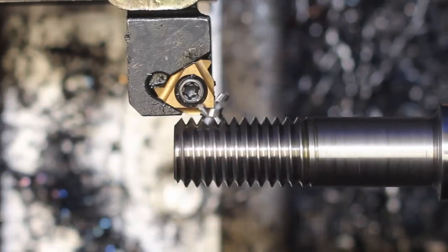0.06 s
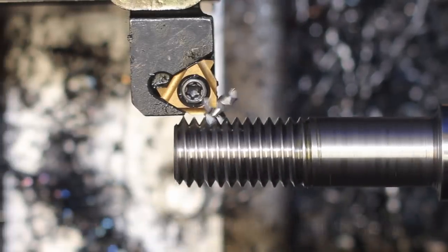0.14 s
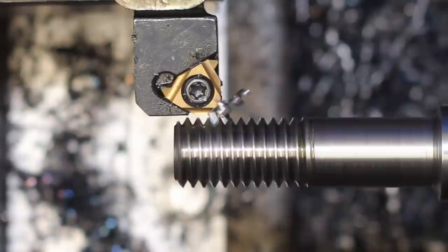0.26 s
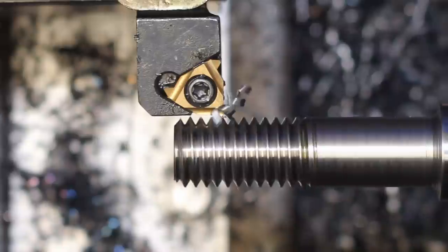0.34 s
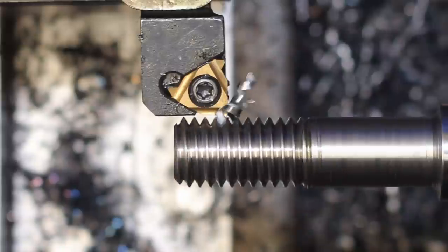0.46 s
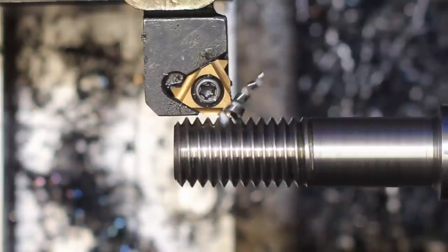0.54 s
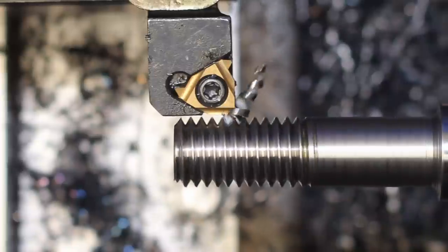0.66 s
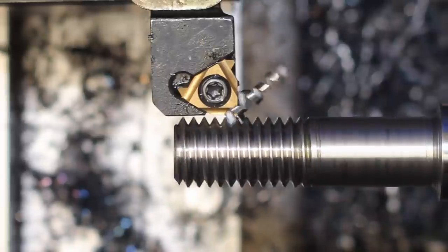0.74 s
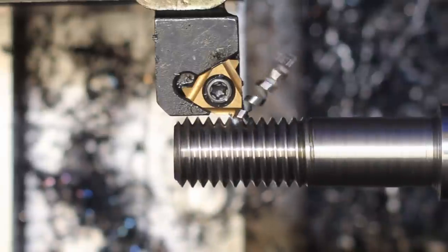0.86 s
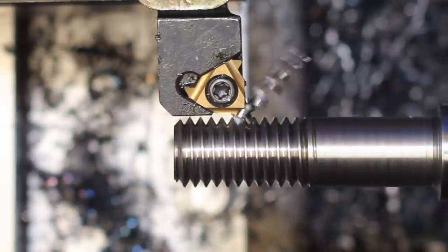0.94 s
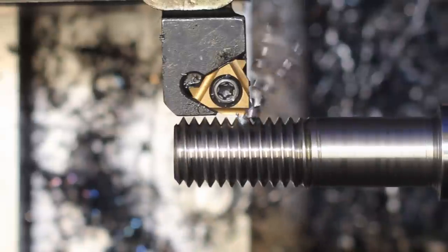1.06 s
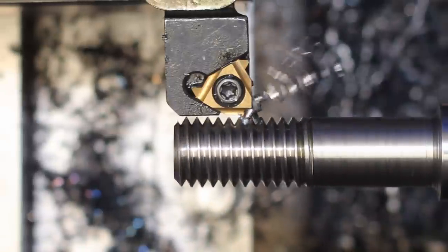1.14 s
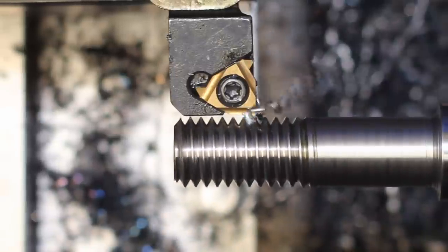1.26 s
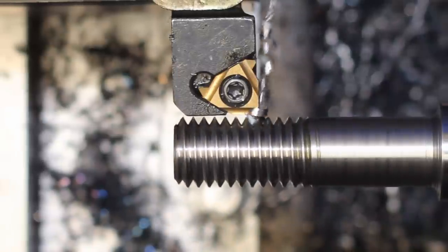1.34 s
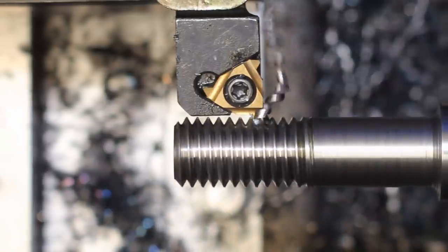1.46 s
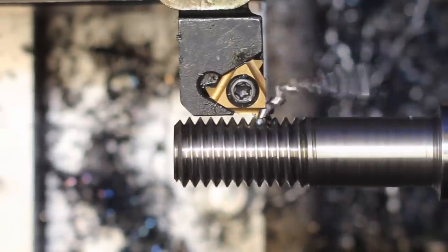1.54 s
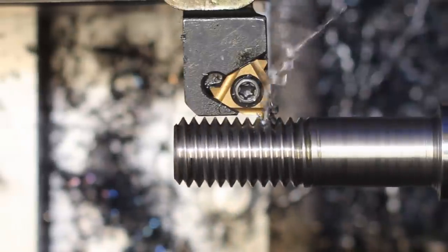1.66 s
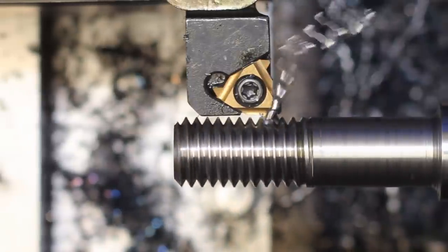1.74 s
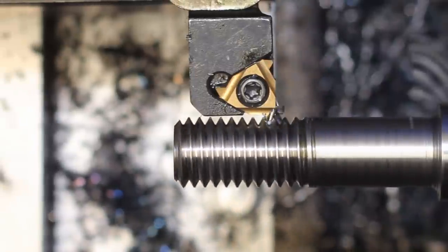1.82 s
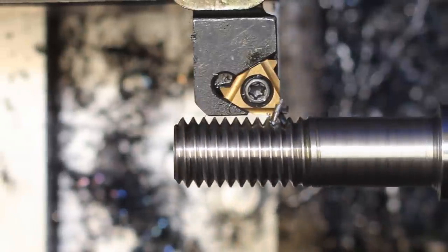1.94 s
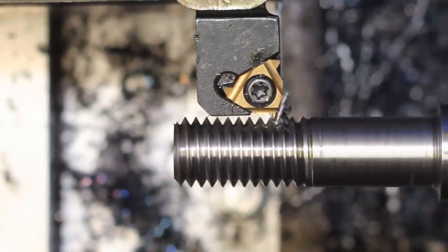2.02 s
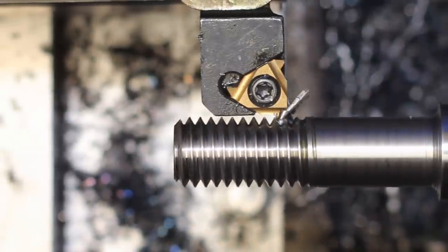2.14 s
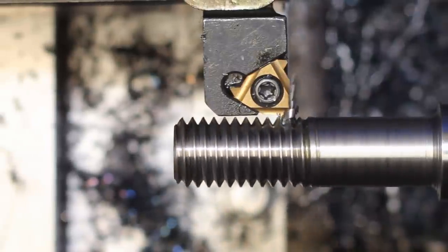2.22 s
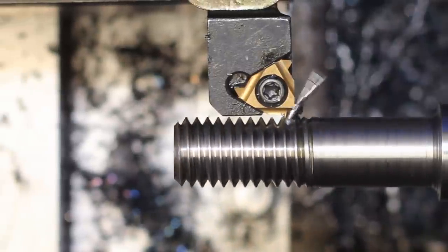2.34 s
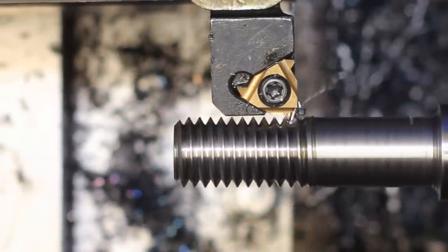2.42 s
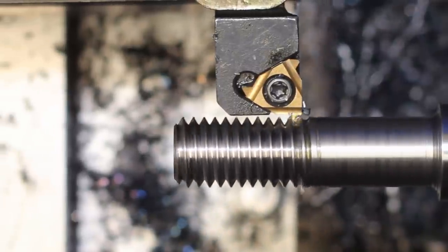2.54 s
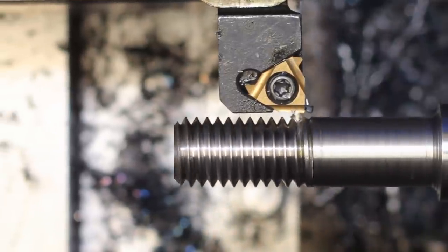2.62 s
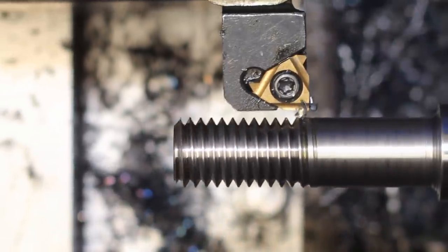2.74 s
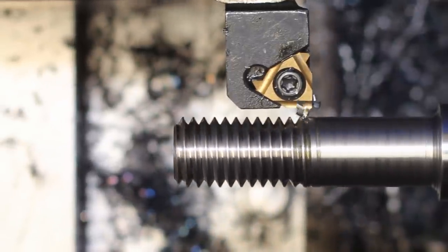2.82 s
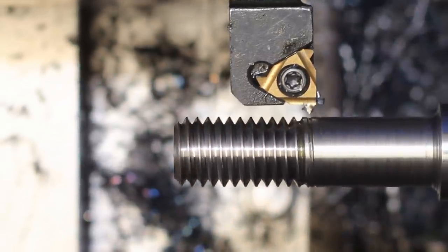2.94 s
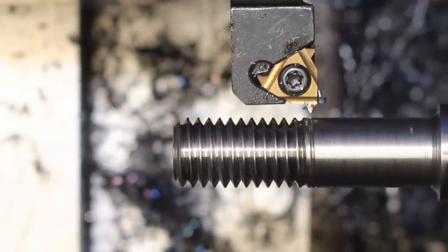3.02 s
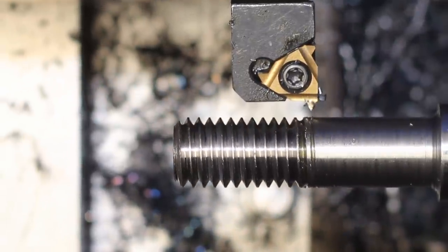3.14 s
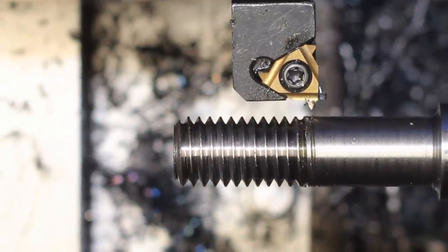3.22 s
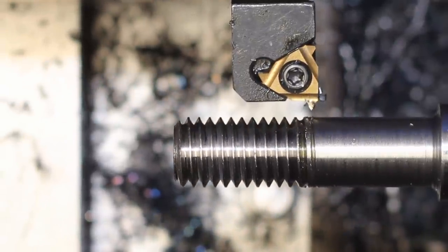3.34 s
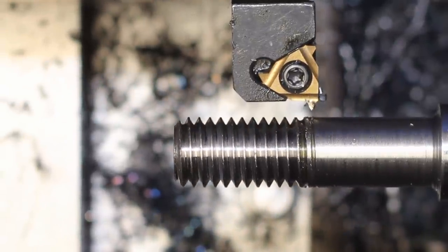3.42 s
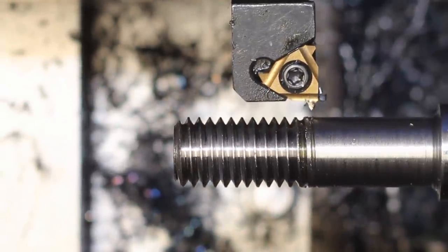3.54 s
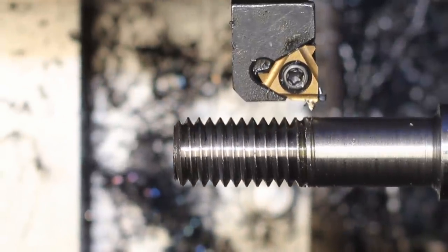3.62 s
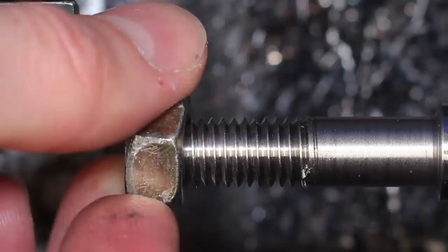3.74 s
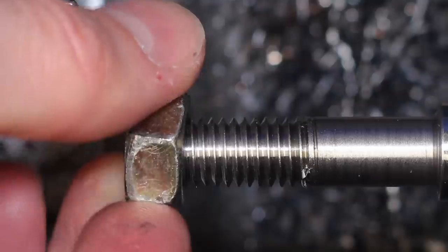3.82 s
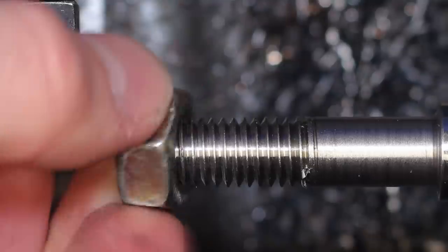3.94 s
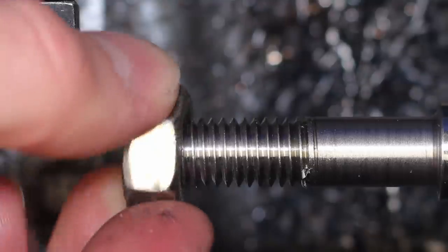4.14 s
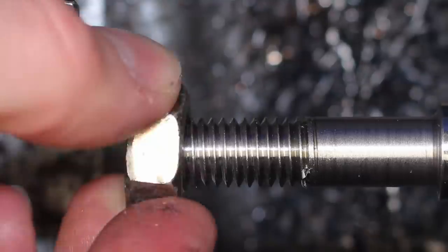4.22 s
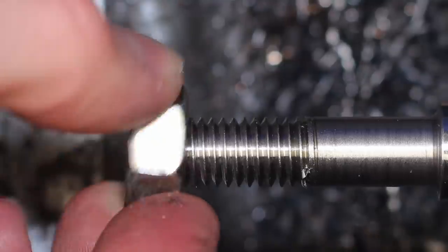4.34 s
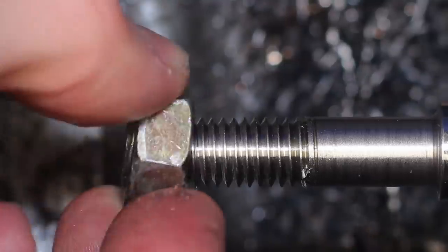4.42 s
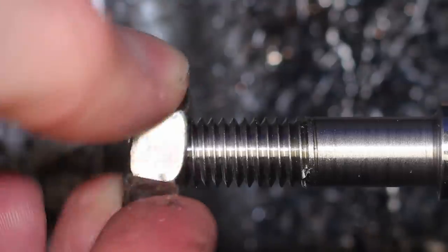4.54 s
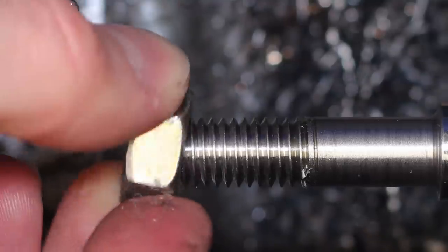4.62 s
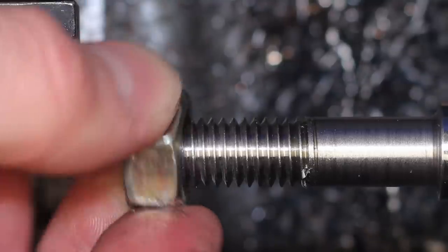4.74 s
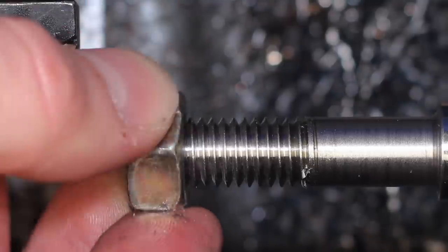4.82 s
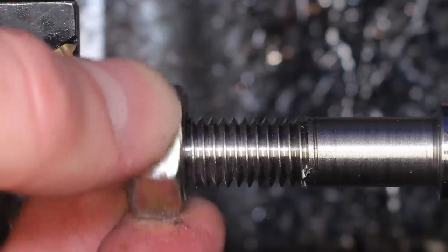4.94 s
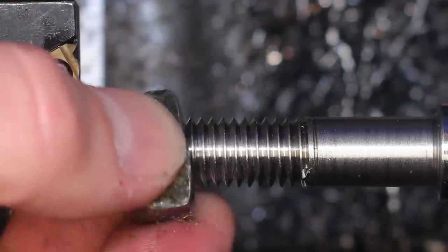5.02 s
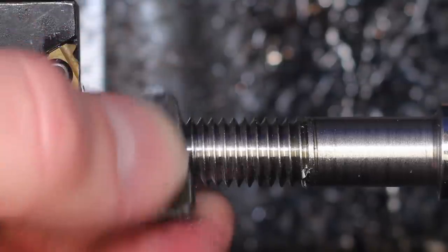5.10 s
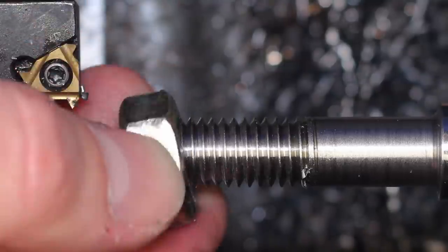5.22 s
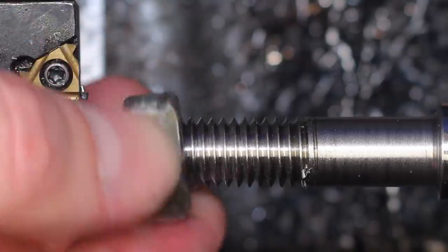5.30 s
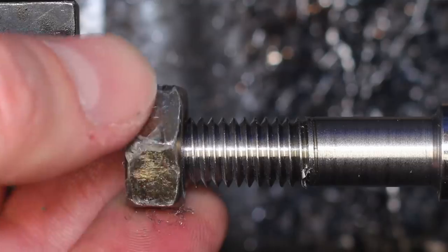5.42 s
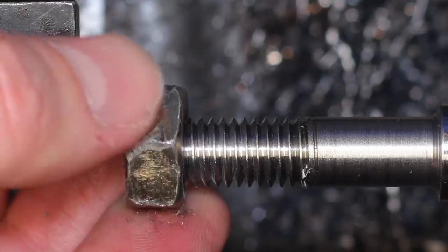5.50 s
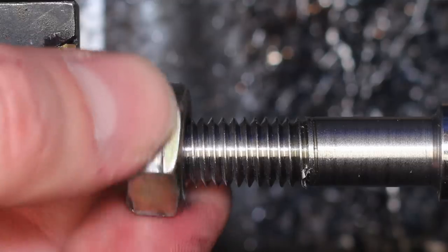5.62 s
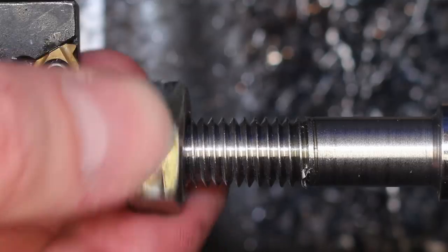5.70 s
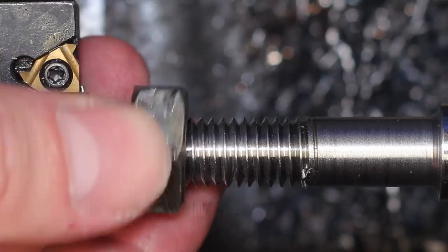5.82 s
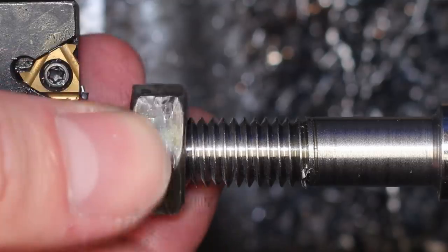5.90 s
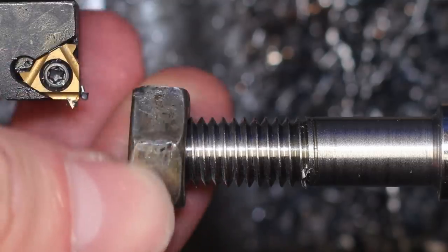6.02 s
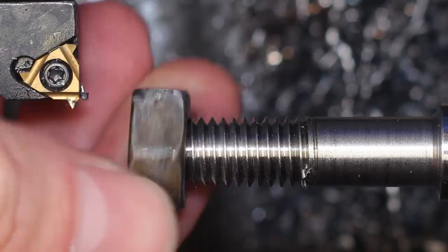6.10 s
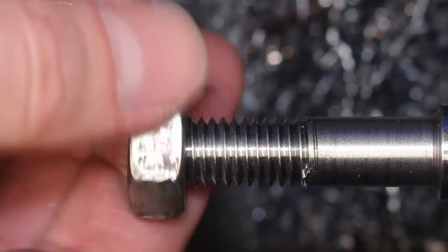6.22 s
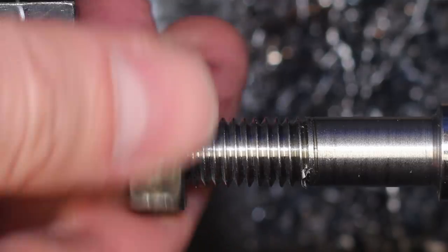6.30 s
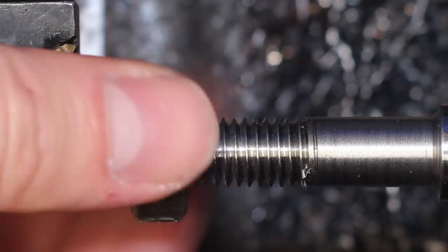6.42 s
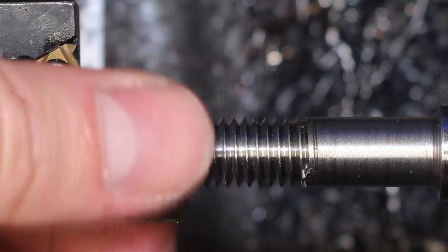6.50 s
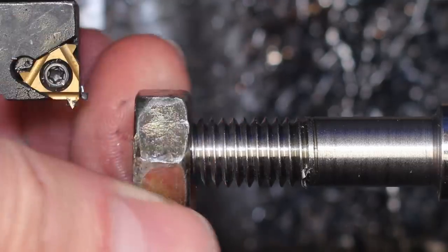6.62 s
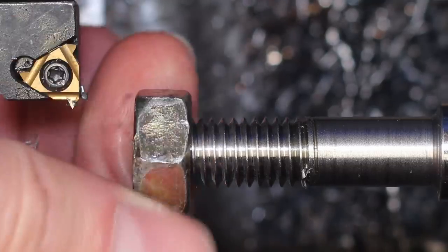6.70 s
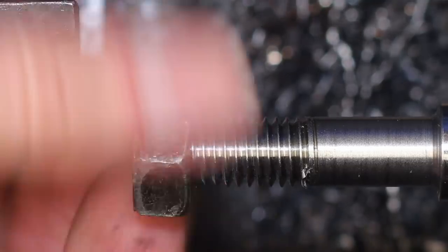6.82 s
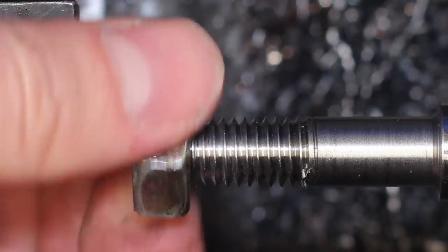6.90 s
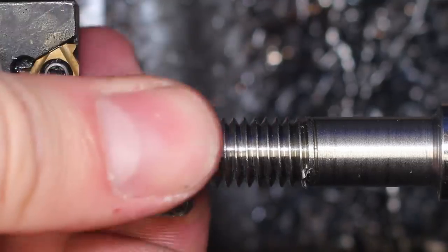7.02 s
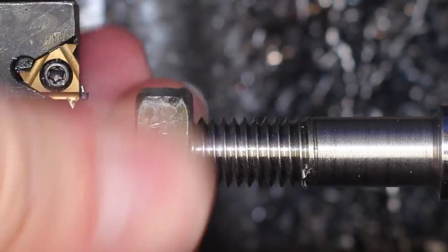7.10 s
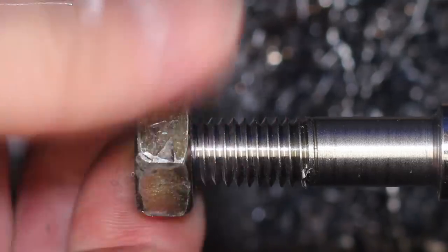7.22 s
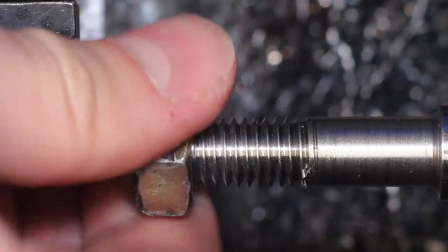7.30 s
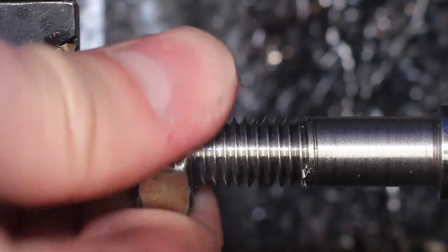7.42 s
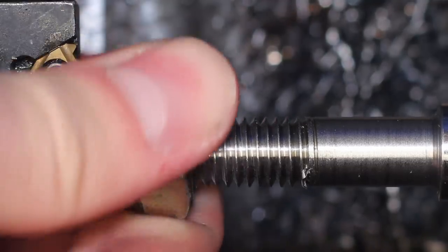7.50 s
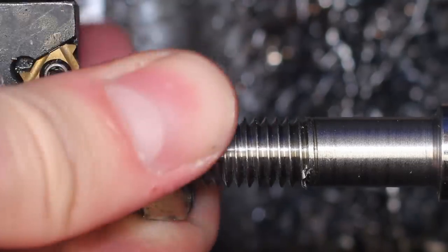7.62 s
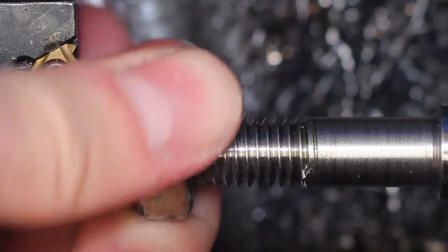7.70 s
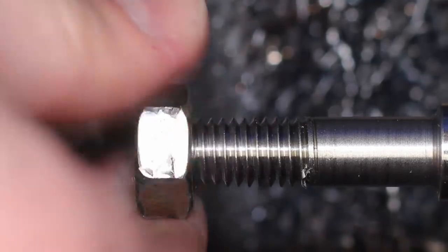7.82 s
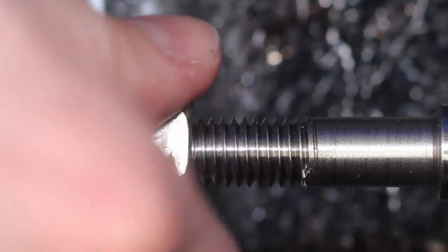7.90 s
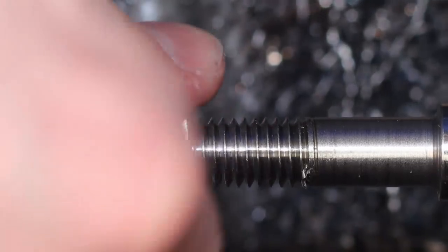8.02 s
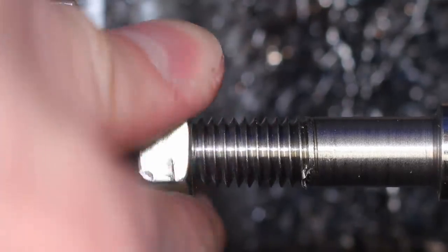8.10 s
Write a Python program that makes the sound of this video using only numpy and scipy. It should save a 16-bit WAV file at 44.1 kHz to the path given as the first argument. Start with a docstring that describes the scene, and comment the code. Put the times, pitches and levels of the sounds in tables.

```python
"""A small lathe in a quiet workshop takes a light threading pass on a steel bolt: gears rattle under load,
the motor whines, the chip hisses, squeals and ticks. The tool leaves the cut, the drive fades as it slows,
a control snaps and the slide is knocked back. Then a steel nut is tried on the thread, with faint taps and rubs.
Noise and pulses ring resonances, the whine and hum are sines, and hard blows strike crowds of dying modes.
It is heard in mono, as by one microphone, with no room or distance added: levels alone set near and far."""
import sys
import numpy as np
from scipy import signal
from scipy.fft import rfft, irfft, next_fast_len
from scipy.io import wavfile
from scipy.ndimage import uniform_filter1d

SR = 44100
rng = np.random.default_rng(int(sys.argv[2]) if len(sys.argv) > 2 else 0)


def int16_out(signal):
    """Quantize to a 16-bit WAV file."""
    q = np.round(np.clip(np.atleast_2d(signal).T, -1, 1) * 32767)
    wavfile.write(sys.argv[1], SR, q.astype(np.int16))


N = 359407
TIME = np.arange(N) / SR
RIPPLE_HZ = 100  # rectified mains
# the tool leaves the cut, and the load on the gears dies away
CUT_END_S, UNLOAD_S = 2.615, 0.047


def amp(db):
    """Decibels to gain."""
    return 10 ** (np.asarray(db) / 20)


def unit(x):
    """Scale to rms 1."""
    return x / np.sqrt(np.mean(x ** 2) + 1e-20)


def curves(rows):
    """Each column of a table, joined by straight lines in time."""
    s, *columns = np.transpose(rows)
    return [np.interp(TIME, s, column) for column in columns]


def at_hz(points, hz):
    """Read a table on a log-frequency axis."""
    f, value = np.transpose(points)
    return np.interp(np.log(np.maximum(hz, 1)), np.log(f), value)


def colour(x, spectrum):
    """Give a steady sound a spectrum; rms 1."""
    size = next_fast_len(N)
    gain = amp(at_hz(spectrum, np.fft.rfftfreq(size, 1 / SR)))
    return unit(irfft(rfft(x, size) * gain, size)[:N])


def drift(rate_hz):
    """Slow chance with spread 1, computed at every 40th sample."""
    r = np.exp(-80 * np.pi * rate_hz / SR)
    noise = rng.standard_normal(N // 40 + 2002)
    slow = signal.lfilter([1], [1, -2 * r, r * r], noise)[2000:]  # drop the filter's start-up
    return np.interp(np.arange(N) / 40, np.arange(len(slow)), unit(slow))


def resonate(x, modes):
    """Parallel resonances of alternating sign."""
    out = 0
    for k, (hz, width_hz, db) in enumerate(modes):
        r = np.exp(-np.pi * width_hz / SR)
        poles = [1, -2 * r * np.cos(2 * np.pi * hz / SR), r * r]
        gain = (-1) ** k * amp(db) * (1 - r * r) / 2
        out = out + gain * signal.lfilter([1, 0, -1], poles, x + 1e-18)
    return out


def band(x, low_hz, high_hz):
    """Causal band-pass."""
    edges = [low_hz, min(high_hz, .45 * SR)]
    return signal.sosfilt(signal.butter(2, edges, "band", fs=SR, output="sos"), x)


def even(x, seconds):
    """Hold the rms near 1, keeping the grain that is faster than the given time."""
    size = int(seconds * SR)
    power = uniform_filter1d(uniform_filter1d(x * x, size), size)
    return x / np.sqrt(power + 1e-12)


def until(end_s, fade_s):
    """Full level up to a moment, then dying away."""
    return np.exp(-np.maximum(TIME - end_s, 0) / fade_s)


def ring(t, hz, t60):
    """One dying mode, which builds up over its first cycle."""
    return np.sin(2 * np.pi * hz * t) * amp(-60 * t / t60) * (1 - np.exp(-(hz * t) ** 2))


def add(out, s, sound):
    """Mix a sound in at a given time."""
    at = int(s * SR)
    out[at:at + len(sound)] += sound[:max(N - at, 0)]


# spindle speed: (time [s], share of full speed)
SPINDLE_SPEED = [(0, 1), (2.98, 1), (3.04, .96), (3.12, .85), (3.25, .3)]


def spindle():
    """Running time in seconds of full speed: it advances more slowly as the spindle slows."""
    speed, = curves(SPINDLE_SPEED)
    return np.cumsum(speed) / SR


# high gear rattle: (time [s], level [dB] before a 2.1 dB cut)
RATTLE_LEVEL = [(0, -34.5), (.27, -33), (.65, -35), (1, -36.5), (2.5, -35.5), (2.93, -41.5), (2.985, -36.5),
                (3.02, -46), (3.11, -61)]
# headstock resonances in three bands: (frequency [Hz], width [Hz], relative level [dB])
HEADSTOCK_BASS = [(171.5, 31, -9), (191.4, 54, -13), (286.8, 16, -4), (316, 11, 0.5), (348, 22, 0.5)]
HEADSTOCK_LOW = [(452.2, 11.8, 2), (485, 27, -12), (508, 10.5, -8)]
HEADSTOCK_HIGH = [(658, 26.4, -1.5), (707, 21, -0.5), (755.2, 13.8, 2.5), (887, 52, -14), (900, 53, -19.5),
                  (1073, 47.5, -8.5), (1342, 32, -14.5), (1834, 17, -14)]
# gear mesh tones: (frequency at full speed [Hz], level [dB] before a 2.5 dB cut)
MESH_TONES = [(173.5, -51.5), (300.5, -39.5)]
# low rumble of the lathe: (frequency [Hz], relative density [dB per Hz])
RUMBLE_SPECTRUM = [(15, -77), (25, -25.5), (164, -14), (214, -14.5), (290, 4.5), (349, -22), (394, -1),
                   (484, -20.5), (684, -5), (893, -8.5), (2580, -23), (3040, -17), (3300, -37), (4290, -42),
                   (7260, -120)]
TEETH_PER_S = 95.94  # at full speed
# low knock of the loaded gear teeth, easing along the pass
LOW_KNOCK_DB, LOW_KNOCK_EASE_DB_PER_S = -36, 2.5
RATTLE_SURGE_DB = 1.3


def gears(run_s):
    """Teeth clatter through their backlash and ring the headstock, over the tones of the mesh."""
    boom_bite_db, knock_bite_db = bites()
    loaded = until(CUT_END_S, UNLOAD_S)
    # one knock per tooth, of random sign and strength, over a noise
    tooth = np.diff(np.floor(TEETH_PER_S * run_s + .3 * drift(40)), prepend=0) > 0
    knocks = tooth * rng.choice([-1, 1], N) * amp(3.24 * rng.standard_normal(N))
    clatter = unit(knocks) + 1.08 * rng.standard_normal(N)

    bass_db = -47.5 + 5.46 * loaded
    bass = amp(bass_db) * even(band(resonate(clatter, HEADSTOCK_BASS), 130, 310), 0.17)
    low_db = LOW_KNOCK_DB - LOW_KNOCK_EASE_DB_PER_S * TIME + knock_bite_db
    low = amp(low_db) * loaded * even(band(resonate(clatter, HEADSTOCK_LOW), 330, 625), 0.055)
    rattle_db, = curves(RATTLE_LEVEL)
    high_db = rattle_db - 2.1 + RATTLE_SURGE_DB * drift(8.7)
    high = amp(high_db) * even(band(resonate(clatter, HEADSTOCK_HIGH), 530, 3200), 0.4)

    tones = 0
    for hz, db in MESH_TONES:
        level = np.sqrt(2) * amp(db - 2.5 + 4.1 * drift(13))
        tones = tones + level * np.sin(2 * np.pi * hz * run_s + 0.67 * drift(6.0))
    rumble = amp(-43.0) * colour(rng.standard_normal(N), RUMBLE_SPECTRUM)
    headstock = (low + high + hum() + boom(boom_bite_db)) * until(3.09, 0.031)
    return headstock + (bass + tones + rumble) * until(2.98, 0.056)


# moments when the tool bites harder:
# (time [s], half length [s], rise of the main mode [dB], rise of the low knock [dB])
HARD_BITES = [(0.083, 0.035, 5.5, 2), (0.313, 0.046, 8.5, 6.5), (0.523, 0.063, 8.5, 8),
              (0.592, 0.042, 10.5, -6), (0.85, 0.083, 9.5, -0.5), (1.767, 0.051, 7.5, 4),
              (2.008, 0.054, 10, 0), (2.215, 0.15, 7, 0.5), (2.372, 0.035, 11, 1), (2.595, 0.071, 11, -12)]


def bites():
    """Each bite is a smooth swell: dB added to the main mode and to the low knock."""
    boom_db, knock_db = 0, 0
    for s, half_s, boom_rise_db, knock_rise_db in HARD_BITES:
        swell = np.exp(-((TIME - s) / half_s) ** 2)
        boom_db = boom_db + swell * boom_rise_db
        knock_db = knock_db + swell * knock_rise_db
    return boom_db, knock_db


# main mode of the headstock, and its level when cutting and running free
BOOM_HZ, BOOM_WIDTH_HZ, BOOM_CUT_DB, BOOM_IDLE_DB = 398.8, 7.6, -39, -42.5


def boom(bite_db):
    """The lightly damped main mode swells whenever the tool bites harder."""
    cutting_level = amp(BOOM_CUT_DB + bite_db) * until(CUT_END_S, UNLOAD_S)
    idle_level = amp(BOOM_IDLE_DB) * until(2.92, 0.14)
    shaken = resonate(rng.standard_normal(N), [(BOOM_HZ, BOOM_WIDTH_HZ, 0)])
    return np.hypot(cutting_level, idle_level) * even(band(shaken, 350, 485), 0.07)


# deep mesh hum: (time [s], level [dB])
MESH_HUM_LEVEL = [(0, -42), (.25, -44.5), (.35, -42), (.7, -40), (1.43, -42.5), (1.54, -38.5), (1.69, -45),
                  (1.85, -43), (1.97, -47.5), (2.15, -41.5), (2.49, -49), (2.56, -74)]
# its pitch: (time [s], frequency [Hz])
MESH_HUM_PITCH = [(0, 92.8), (.4, 93.2), (.75, 95.2), (1.3, 95.4), (2.4, 97.5)]
MAINS_DB = -56


def hum():
    """The deep mesh tone creeps up in pitch, so its beat against the mains hum slows down."""
    db, = curves(MESH_HUM_LEVEL)
    hz, = curves(MESH_HUM_PITCH)
    mesh = amp(db) * np.sin(2 * np.pi * np.cumsum(hz) / SR)
    mains = amp(MAINS_DB) * np.sin(2 * np.pi * RIPPLE_HZ * TIME)
    return np.sqrt(2) * (mesh - mains)


# motor: (time [s], whine level [dB])
MOTOR_LEVEL = [(0, -52.5), (.6, -49.5), (.85, -48.5), (2.9, -48.5), (3, -53)]
# commutator whine and its mains sidebands: (frequency at full speed [Hz], relative level [dB])
WHINE_LINES = [(979.6, 0), (1859.2, -9.5), (1959.2, -12), (2838.8, -20), (2938.8, 0), (3038.8, -9),
               (3138.8, -11)]
# the brushes flutter in a cluster of close lines; levels are relative to the whine
FLUTTER_FROM_HZ, FLUTTER_STEP_HZ = 3058.8, 20
FLUTTER_DB, BRUSH_NOISE_DB = -9.5, -8


def motor(run_s):
    """The commutator whines with sidebands from the rectified mains; the brushes flutter and spark."""
    db, = curves(MOTOR_LEVEL)
    whine, flutter = 0, 0
    for hz, line_db in WHINE_LINES:
        level = amp(line_db + 1.3 * drift(12))
        whine = whine + level * np.cos(2 * np.pi * hz * run_s + .25 * drift(14))
    for k in range(7):
        hz = FLUTTER_FROM_HZ + k * FLUTTER_STEP_HZ
        flutter = flutter + np.cos(2 * np.pi * hz * run_s + 2 * drift(.5))
    sparks = rng.standard_normal(N) * (1 + 0.33 * np.cos(2 * np.pi * RIPPLE_HZ * TIME))
    brushes = unit(band(band(sparks, 2990, 3250), 2990, 3250))
    mix = np.sqrt(2) * whine + amp(FLUTTER_DB) * unit(flutter) + amp(BRUSH_NOISE_DB) * brushes
    return amp(db) * until(3.01, 0.0036) * mix


# width of the chip's moving resonances, and how much the long curl's ring flickers
CHIP_WIDTH_HZ, CHIP_FLICKER_DB = 160, 4


def gliding(hz):
    """Noise in a resonance whose centre moves; rms 1."""
    lowpass = signal.butter(2, CHIP_WIDTH_HZ / 2, fs=SR, output="sos")
    grain = signal.sosfilt(lowpass, rng.standard_normal((2, len(hz))))
    phase = 2 * np.pi * np.cumsum(hz) / SR
    return unit(grain[0] * np.cos(phase) + grain[1] * np.sin(phase))


# chip: (time [s], reference level [dB] for its three parts)
CHIP_LEVEL = [(0, -47.5), (.7, -47), (1.2, -47.5), (1.55, -47.5), (1.7, -47), (2.35, -46.5), (2.6, -48)]
# tool tip that crunches while the chip is short: (frequency [Hz], width [Hz], relative level [dB])
TOOL_TIP_MODES = [(2730, 150, 3.5), (2894, 59, 3)]
# tool holder under the scrape: (frequency [Hz], width [Hz], relative level [dB])
HOLDER_MODES = [(1340, 160, 0), (1810, 310, -3), (2156, 180, 0.5), (2390, 66, 1)]
CURL_HZ, CURL_WANDER_HZ = 2202, 101.2  # the ring of the long curl
CRUNCH_DB, CURL_GROWS_S = -1.5, 1  # the chip stays short early in the pass


def cutting():
    """The chip shears in dense slips that ring the holder: short, it crunches; its long curl rings lower."""
    db, = curves(CHIP_LEVEL)
    early = np.exp(-(TIME / CURL_GROWS_S) ** 2)
    slips = rng.standard_normal(N) * amp(2.0 * drift(25))
    curl = gliding(CURL_HZ + CURL_WANDER_HZ * drift(9.55)) * amp(CHIP_FLICKER_DB * drift(26.0))
    singing = even(curl, 0.08) * amp(-3 * early)
    crunch = amp(CRUNCH_DB) * unit(band(resonate(slips, TOOL_TIP_MODES), 2730, 2950)) * early
    scrape = unit(band(resonate(slips, HOLDER_MODES), 1330, 3000))
    mix = amp(-9.5) * singing + crunch + amp(-3.0) * scrape
    return amp(db) * until(CUT_END_S, UNLOAD_S) * mix


# squeals of the curling chip: (time [s], from [Hz], to [Hz], level [dB])
SQUEAL_GLIDES = [(.045, 2800, 2730, -49), (2.065, 2320, 2065, -48), (.145, 2030, 2440, -46),
                 (.32, 2740, 2910, -47), (.415, 2876, 2734, -48), (.985, 2430, 2130, -50),
                 (0.936, 2860, 2820, -45.5), (1.14, 2800, 2710, -47), (1.775, 2100, 2410, -47),
                 (1.365, 1900, 2245, -47), (1.435, 2860, 2740, -47), (1.535, 2760, 2800, -48),
                 (1.665, 2195, 2150, -43.5), (1.735, 2870, 2530, -47), (1.83, 2690, 2910, -47.5),
                 (1.89, 2190, 2085, -46.5), (1.955, 2130, 2240, -43.5), (2.026, 2520, 2850, -49),
                 (2.125, 2630, 2810, -48), (2.24, 2110, 2340, -46.5), (2.365, 2310, 2066, -44),
                 (2.42, 2590, 2910, -48)]
SQUEAL_S = .06


def squeals():
    """The chip sticks and slips on the tool; its rough ring glides as the curl grows or breaks."""
    t, out = np.arange(SR // 8) / SR - 1 / 16, np.zeros(N)
    swell = np.exp(-(2 * t / SQUEAL_S) ** 2)
    for s, from_hz, to_hz, db in SQUEAL_GLIDES:
        hz = (from_hz + to_hz) / 2 + (to_hz - from_hz) * np.tanh(2 * t / SQUEAL_S) / 2
        add(out, max(s + t[0], 0), amp(db) * even(gliding(hz), 0.011) * swell)
    return out


# sharp ticks from swarf and gear teeth: (time [s], level [dB])
TICK_TIMES = [(.017, -54), (.6564, -50.5), (.8435, -55), (1.0345, -54), (1.3593, -53), (1.4112, -55),
              (1.721, -57), (2.4, -58), (2.6378, -54), (2.7565, -54.5), (2.8752, -57)]
# their resonances: (frequency [Hz], width [Hz], relative level [dB])
TICK_RESONANCES = [(4270, 650, -5), (5500, 660, 5.5), (7200, 1200, -1)]
TICK_FALL_S = 0.014


def ticks():
    """Each tick is a brief bright crackle of steel."""
    t, out = np.arange(SR // 12) / SR, np.zeros(N)
    for s, db in TICK_TIMES:
        crackle = unit(band(resonate(rng.standard_normal(len(t)), TICK_RESONANCES), 3500, 10000))
        add(out, s, amp(db) * crackle * np.exp(-t / TICK_FALL_S))
    return out


# bright friction of tool and gears: (time [s], level [dB])
FRICTION_LEVEL = [(0, -53), (.7, -53.5), (1.4, -55.5), (2.5, -55.5), (2.65, -59), (3, -58)]
# its hiss: (frequency [Hz], relative density [dB per Hz])
HISS_SPECTRUM = [(1940, -20), (3300, 0), (3570, -4), (4160, -6.5), (4940, -11), (5450, -10), (9010, -17.5),
                 (10300, -16.5), (15200, -25.5), (16000, -23)]
# narrow steel resonances in the hiss: (frequency [Hz], width [Hz], relative level [dB])
STEEL_MODES = [(4050, 110, 5), (4420, 300, 3), (6900, 43, -8), (8800, 150, -14), (10300, 80, -10),
               (12700, 300, -19)]
STEEL_DB = -5.5  # relative to the hiss


def friction():
    """Sliding steel hisses unevenly, buzzing with the motor's torque."""
    db, = curves(FRICTION_LEVEL)
    buzz = 1 + 0.036 * np.cos(2 * np.pi * RIPPLE_HZ * TIME)
    hiss = colour(rng.standard_normal(N) * buzz * amp(2.0 * drift(29)), HISS_SPECTRUM)
    steel = amp(STEEL_DB) * unit(band(resonate(rng.standard_normal(N), STEEL_MODES), 3100, 17000))
    return amp(db) * (hiss + steel) * until(2.996, 0.035)


def thuds(rows):
    """A soft contact excites only the lowest modes: here one dying mode per contact."""
    t, out = np.arange(SR // 2) / SR, np.zeros(N)
    for s, db, hz, t60 in rows:
        add(out, s, amp(db) * ring(t, hz, t60))
    return out


# clunks of the drive: (time [s], level [dB], frequency [Hz], decay t60 [s])
BACKLASH_CLUNKS = [(2.966, -28, 303, 0.19), (3.025, -35, 184, 0.2)]


def clunks():
    """The gears take up their backlash as the drive is cut."""
    return thuds(BACKLASH_CLUNKS)


# crowded modes last up to this factor longer or shorter than their band
DECAY_SPREAD, BLOW_RISE_S = 1.35, .0003


def blow(contacts, spectrum, decay, modes, crack_db, crack_s):
    """A hard blow: each contact cracks and strikes crowded steel modes anew, along with a few strong modes."""
    t, out = np.arange(SR // 4) / SR, np.zeros(N)
    edges = np.geomspace(100, 17000, 16)
    crowds, cracks = 0, 0
    for low, high in zip(edges, edges[1:]):
        hz, count = np.sqrt(low * high), max(6, int((high - low) / 35))
        t60 = at_hz(decay, hz)
        gain = amp(at_hz(spectrum, hz)) * np.sqrt((high - low) / t60)
        place, start, life = rng.random((3, count, 1))
        pitches = low + (high - low) * (np.arange(count)[:, None] + place) / count
        lives = t60 * DECAY_SPREAD ** (2 * life - 1)
        rings = np.sin(2 * np.pi * (pitches * t + start)) * np.exp(-np.log(1000) * t / lives)
        strengths = unit(rng.uniform(-0.97, 1, (len(contacts), count)))
        crowds = crowds + gain * np.sqrt(2 / count) * (strengths @ rings)
        cracks = cracks + gain * unit(band(rng.standard_normal((len(contacts), len(t))), low, high))
    strong = sum(amp(level_db) * ring(t, hz, t60) for hz, level_db, t60 in modes)
    for (s, db), crowd, crack in zip(contacts, crowds, cracks):
        wash = crowd * (1 - np.exp(-t / BLOW_RISE_S)) + amp(crack_db) * crack * np.exp(-t / crack_s)
        wash = wash / np.std(wash[:SR // 200])  # level set by the first 5 ms
        add(out, s, amp(db) * (amp(-4.0) * wash + strong))
    return out


# control snap, contacts: (time [s], level [dB])
SNAP_CONTACTS = [(3.1338, -21.5), (3.1383, -34)]
# its spectrum: (frequency [Hz], relative level [dB])
SNAP_SPECTRUM = [(100, -53), (200, -13), (431, -1), (800, -8), (1100, -18), (1500, -1), (2200, -10.5),
                 (3500, -4), (5000, -6.5), (7500, -7.5), (10000, -15), (16000, -15)]
# its decay: (frequency [Hz], t60 [s])
SNAP_T60 = [(300, 0.37), (1500, 0.14), (5000, 0.13), (14000, 0.1)]
# its strong modes: (frequency [Hz], relative level [dB], t60 [s])
SNAP_STRONG = [(389, -17.5, 0.13), (467, -12.5, 0.076), (1035, -12, 0.11), (1090, -10.5, 0.081),
               (3470, -8, 0.091), (4430, -4.5, 0.028)]


def snap():
    """A control snaps over in two quick contacts."""
    return blow(SNAP_CONTACTS, SNAP_SPECTRUM, SNAP_T60, SNAP_STRONG, crack_db=10.5, crack_s=0.0066)


# slide knock, contacts: (time [s], level [dB])
KNOCK_CONTACTS = [(3.6488, -36), (3.6518, -17), (3.6565, -25.5), (3.6622, -28.5)]
# its spectrum: (frequency [Hz], relative level [dB])
KNOCK_SPECTRUM = [(100, -33), (170, -10), (398, -4), (600, -10), (900, -8), (1300, -4.5), (1750, 2.5),
                  (2450, -4.5), (2920, -20), (3500, -5.5), (5200, -5), (7300, -12.5), (9800, -26),
                  (16000, -25)]
# its decay: (frequency [Hz], t60 [s])
KNOCK_T60 = [(300, 0.31), (1500, 0.12), (5000, 0.097), (14000, 0.14)]
# its strong modes: (frequency [Hz], relative level [dB], t60 [s])
KNOCK_STRONG = [(180.5, -17, 0.16), (283, -12.5, 0.09), (403, -13.5, 0.17), (1520, 0, 0.016),
                (1840, -18, 0.07), (2410, -12, 0.077), (3410, -13, 0.071)]


def knock():
    """The slide is knocked back in four close contacts."""
    return blow(KNOCK_CONTACTS, KNOCK_SPECTRUM, KNOCK_T60, KNOCK_STRONG, crack_db=8.5, crack_s=0.005)


# handwheel click, contact: (time [s], level [dB])
CLICK_CONTACTS = [(3.4568, -40)]
# its strong modes: (frequency [Hz], relative level [dB], t60 [s])
CLICK_STRONG = [(2630, -2, 0.047), (3080, -12, .06)]


def click():
    """A light click of the handwheel, with the spectrum and decay of the snap."""
    return blow(CLICK_CONTACTS, SNAP_SPECTRUM, SNAP_T60, CLICK_STRONG, crack_db=14, crack_s=0.0029)


# bolt and chuck resonances in three bands: (frequency [Hz], width [Hz], relative level [dB])
BOLT_CHUCK_LOW = [(170, 17, -16.5), (293.6, 19, -15), (397.4, 17.6, -0.5), (500, 22, -6)]
BOLT_CHUCK_MID = [(665, 170, -0.5), (757, 31, 12.5), (872, 49, -11.5)]
BOLT_CHUCK_HIGH = [(915, 90, 2), (1340, 180, -1.5), (1747, 85, 3), (2223, 47, 3.5), (2434, 47, 1.5),
                   (2880, 420, -2), (3980, 820, -6.5), (5030, 2700, -8.5)]
# the low modes ring with every touch: level for a medium touch before the low_db offset,
# and the share of its force that they follow
RING_DB, MEDIUM_TOUCH_DB, RING_FOLLOWS = -57, -43.5, 0.67
SLIPS_PER_S, SLIP_SPREAD_DB = 600, 5.5


def touches(rows, rise_s, fall_s, low_db, mid_db, high_db, tail_db, tail_s):
    """Each touch is a swell of uneven slips that rings bolt, chuck and headstock and lingers faintly."""
    lead, out = .1, np.zeros(N)  # the swell begins this many seconds early
    t = np.arange(SR // 3) / SR - lead
    for s, body_db, treble_db, dull_hz in rows:
        ring_db = RING_DB + RING_FOLLOWS * (body_db - MEDIUM_TOUCH_DB)
        force = np.exp(np.minimum(t / rise_s, -t / max(fall_s, .001)))
        sizes = rng.choice([-1, 1], len(t)) * amp(SLIP_SPREAD_DB * rng.uniform(-2.7, 1, len(t)))
        slips = force * sizes * (rng.random(len(t)) < SLIPS_PER_S / SR)
        slips[int(lead * SR)] = 1.38  # the main slip, as the grip lets go
        tail = (t > 0) * np.exp(-np.abs(t) / tail_s) * rng.standard_normal(len(t))
        slips = slips + amp(tail_db) * tail
        slips = signal.sosfilt(signal.butter(2, dull_hz, fs=SR, output="sos"), slips)
        voices = ((BOLT_CHUCK_LOW, ring_db + low_db),
                  (BOLT_CHUCK_MID, body_db + mid_db),
                  (BOLT_CHUCK_HIGH, treble_db + high_db))
        for modes, db in voices:
            sound = band(resonate(slips, modes), 0.85 * modes[0][0], 1.09 * modes[-1][0])
            loudest = np.sqrt(uniform_filter1d(sound ** 2, size=SR // 50).max())
            add(out, s - lead, amp(db) * sound / loudest)
    return out


# taps of steel on steel, levels before the offsets in taps():
# (time [s], body level [dB], treble level [dB], frequency above which the contact is dull [Hz])
NUT_TAPS = [(3.395, -53.5, -48.5, 2500), (4.004, -42.5, -47, 6000), (4.408, -49, -54, 3000),
            (4.586, -44, -56, 2400), (4.604, -54, -47, 2600), (4.722, -47.5, -59, 2000),
            (5.057, -39.5, -44.5, 3200), (5.357, -40.5, -52, 3200), (5.382, -41, -47, 5000),
            (5.792, -40, -49, 2800), (5.899, -48.5, -60, 1500), (6.321, -54, -58, 3200),
            (6.5, -42, -52, 1690), (6.608, -52, -51, 5490), (7.008, -31, -44, 4000),
            (7.016, -36, -46, 3500), (7.254, -44, -54, 1800), (7.513, -46, -55.5, 2400)]


def taps():
    """The nut taps the bolt: quick touches that die away within hundredths of a second."""
    return touches(NUT_TAPS, rise_s=.001, fall_s=.008, low_db=-1.5, mid_db=-14.0, high_db=-8.5,
                   tail_db=-27, tail_s=0.024)


# turns of the nut by the fingers: (start [s], end [s], body level [dB] before the offset in rubs())
FINGER_TURNS = [(4.418, 4.46, -53), (4.553, 4.58, -55), (4.633, 4.819, -57), (4.998, 5.117, -55),
                (5.173, 5.25, -54.5), (5.441, 5.483, -60), (5.696, 5.789, -57.5), (5.989, 6.044, -57.5),
                (6.3, 6.444, -53.5), (6.52, 6.6, -60), (7.178, 7.219, -57)]
# the treble is relative to the body
RUBS_PER_S, RUB_SPREAD_DB, RUB_TREBLE_DB, RUB_DULL_HZ = 27, 1, -5.5, 3000


def faint_rubs():
    """Unevenly spaced small rubs fill each turn of the nut: rows like those of the louder rubs."""
    rows = []
    for start, end, db in FINGER_TURNS:
        count = max(1, round((end - start) * RUBS_PER_S))
        for k, (late, body, treble) in enumerate(rng.standard_normal((32, 3))[:count]):
            s = start + (end - start) * (k + .5 + .2 * late) / count
            body_db = db + RUB_SPREAD_DB * body
            treble_db = db + RUB_TREBLE_DB + RUB_SPREAD_DB * treble
            rows.append((s, body_db, treble_db, RUB_DULL_HZ))
    return rows


# the nut binds and rubs on the thread, levels before the offsets in rubs():
# (time [s], body level [dB], treble level [dB], frequency above which the contact is dull [Hz])
NUT_RUBS = [(3.479, -59, -52.5, 5000), (4.023, -48.5, -45.5, 4000), (4.178, -44, -50, 3500),
            (4.198, -43, -50.5, 3000), (4.61, -49, -52, 2600), (5.052, -40.5, -44.5, 3200),
            (5.398, -49, -49, 3500), (5.801, -42, -46.5, 2400), (6.402, -48.5, -53, 3000),
            (6.618, -50, -45, 3500), (6.64, -46, -56, 2600), (7.248, -52, -57, 1600)]


def rubs():
    """Binding threads let go in slower swells than the taps."""
    return touches(NUT_RUBS + faint_rubs(), rise_s=0.015, fall_s=0.013, low_db=2.5, mid_db=-9.5,
                   high_db=-9.5, tail_db=-39.5, tail_s=0.053)


# nut catch, contacts: (time [s], level [dB])
CATCH_CONTACTS = [(7.008, -53), (7.0157, -40.5)]
# its spectrum: (frequency [Hz], relative level [dB])
CATCH_SPECTRUM = [(150, -28), (1500, 3), (3500, 0), (7000, 0.5), (8500, -30), (11000, -24), (16000, -34)]
# its decay: (frequency [Hz], t60 [s])
CATCH_T60 = [(300, 0.11), (14000, 0.04)]
# its strong modes: (frequency [Hz], relative level [dB], t60 [s])
CATCH_STRONG = [(1745, -4, 0.095), (10400, -22, .05)]


def catch():
    """The nut's edge catches the thread with a short, bright crack."""
    return blow(CATCH_CONTACTS, CATCH_SPECTRUM, CATCH_T60, CATCH_STRONG, crack_db=13, crack_s=0.00068)


# bumps of the hand on the machine: (time [s], level [dB], frequency [Hz], decay t60 [s])
HAND_BUMPS = [(3.408, -46, 390, 0.19), (3.482, -47, 400, 0.13), (3.5, -57.5, 169, 0.18),
              (4.605, -54.5, 168, 0.24), (5.087, -45, 402, 0.14), (7.012, -55.5, 93, 0.37),
              (7.013, -48, 179, 0.12), (7.835, -57, 170, 0.27)]


def bumps():
    """The hand bumps the machine softly and rings its low modes."""
    return thuds(HAND_BUMPS)


# air of the quiet workshop: (frequency [Hz], relative density [dB per Hz])
AIR_SPECTRUM = [(20, -26), (50, -20.5), (85, -19.5), (100, -11), (120, -23), (170, -18), (230, -17),
                (400, -15.5), (620, -18.5), (1120, -20), (3160, -23.5), (8000, -29.5), (16000, -32)]
AIR_DB = -62.5


def air():
    """The workshop's background is a steady coloured noise."""
    return amp(AIR_DB) * colour(rng.standard_normal(N), AIR_SPECTRUM)


def scene():
    """The running lathe, the clacks of its controls, the nut and the quiet workshop."""
    run_s = spindle()
    lathe = gears(run_s) + motor(run_s) + cutting() + squeals() + ticks() + friction() + clunks()
    controls = band(snap() + knock(), 100, 19000) + band(click(), 200, 4500)
    nut = taps() + rubs() + catch()
    return (lathe + controls + nut + bumps() + air())[None]


CUTOFF_HZ, OFFSET = 15900, .0007  # offset as a share of full scale


def record(dry):
    """After the microphone the top is cut steeply; the converter adds a tiny constant offset."""
    steep = signal.ellip(10, .1, 80, CUTOFF_HZ, fs=SR, output="sos")
    return OFFSET + signal.sosfilt(steep, dry)


dry = scene()
out = record(dry)
int16_out(out)
```